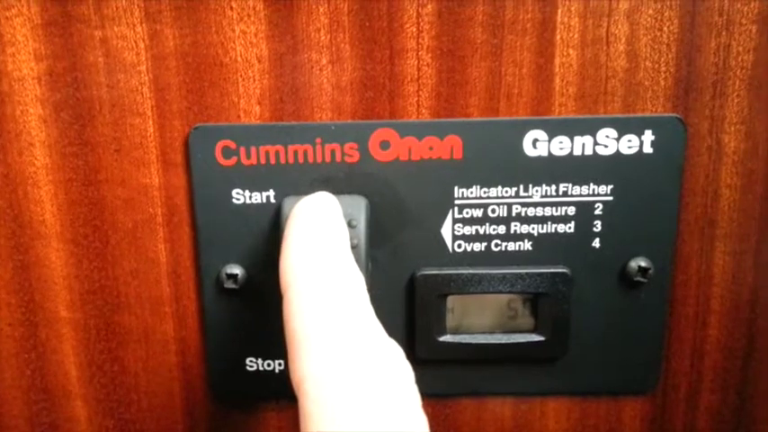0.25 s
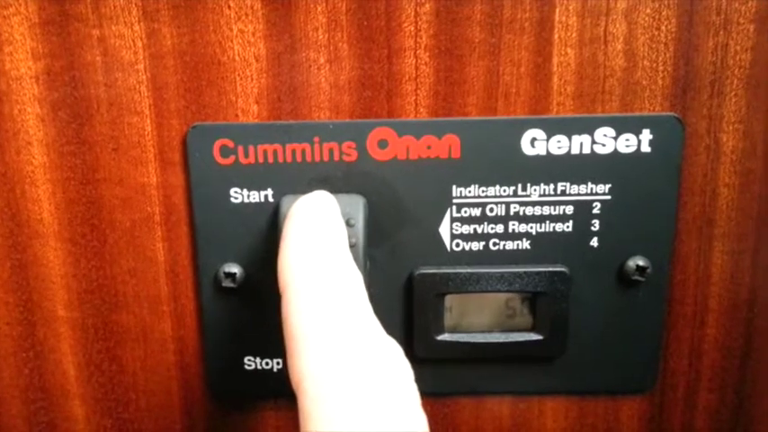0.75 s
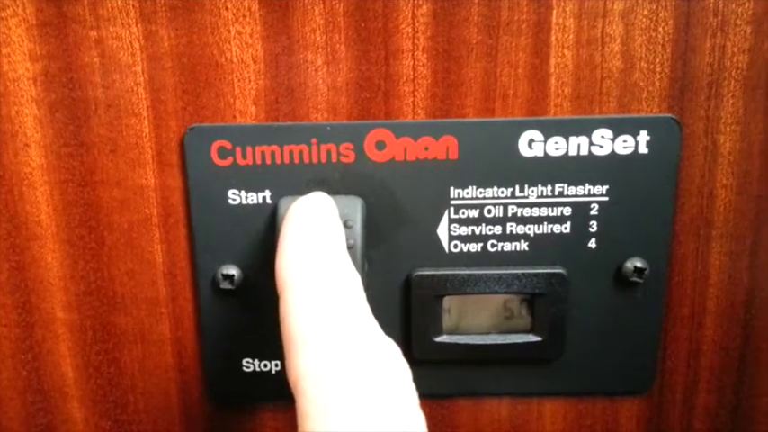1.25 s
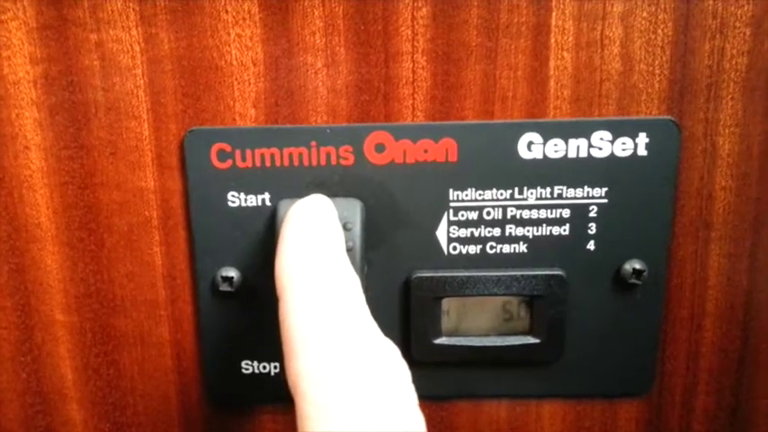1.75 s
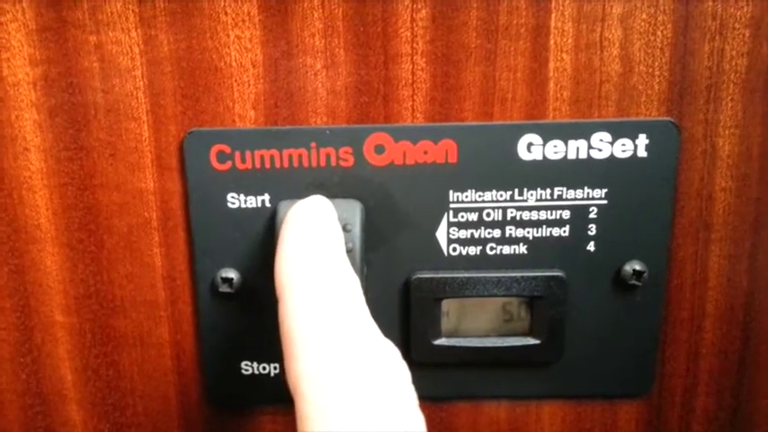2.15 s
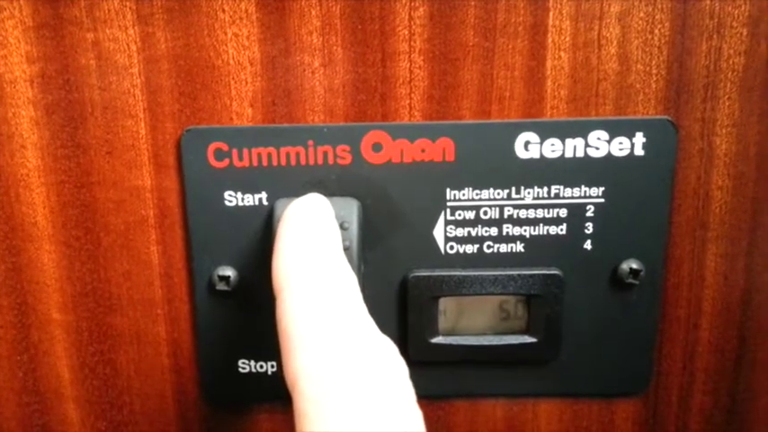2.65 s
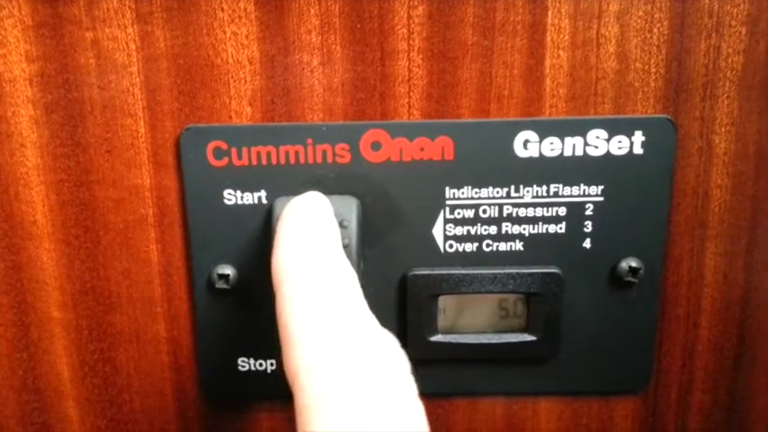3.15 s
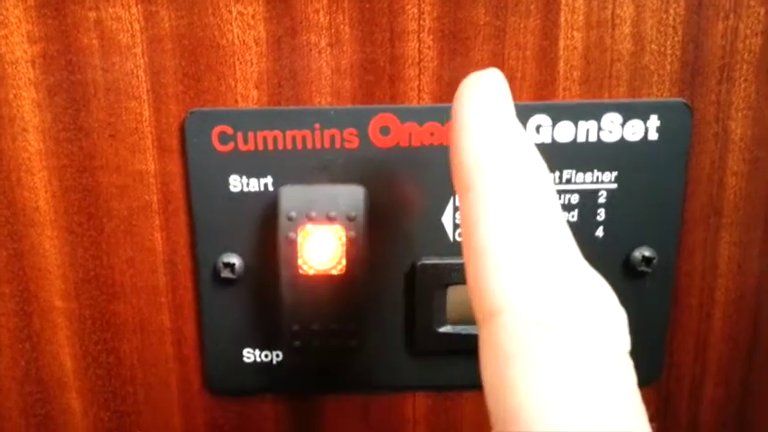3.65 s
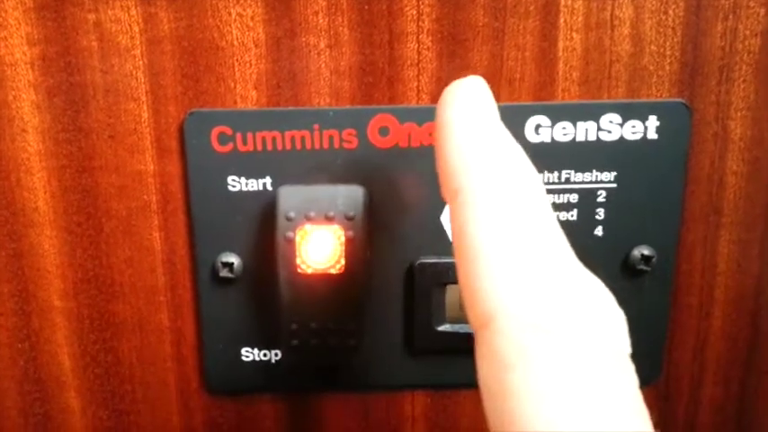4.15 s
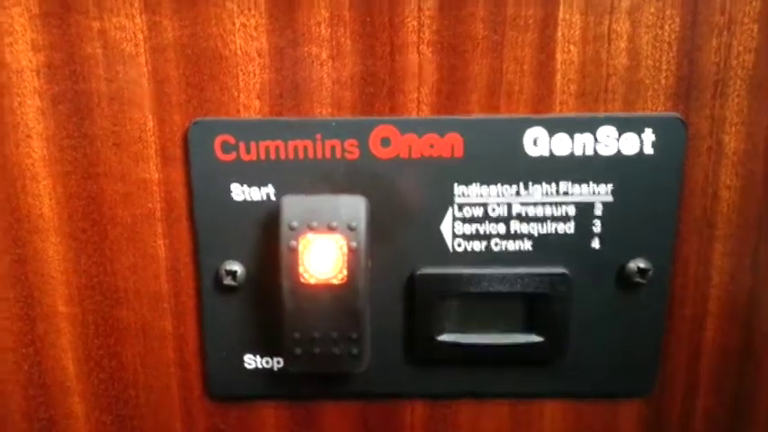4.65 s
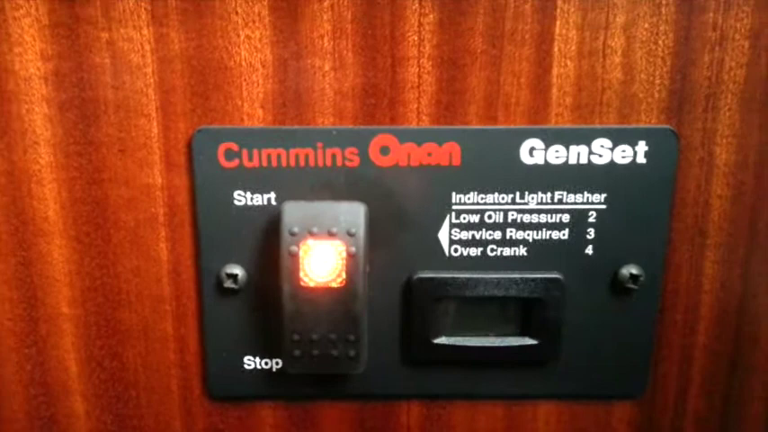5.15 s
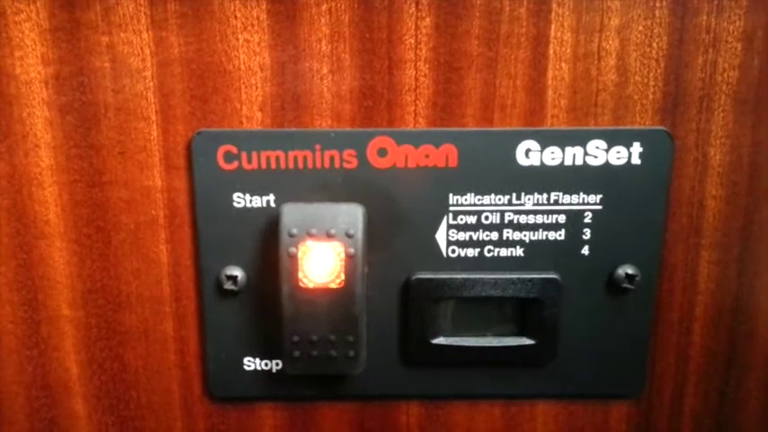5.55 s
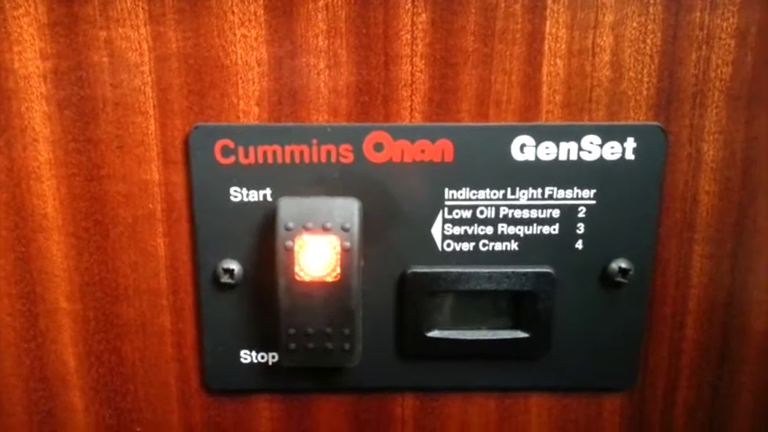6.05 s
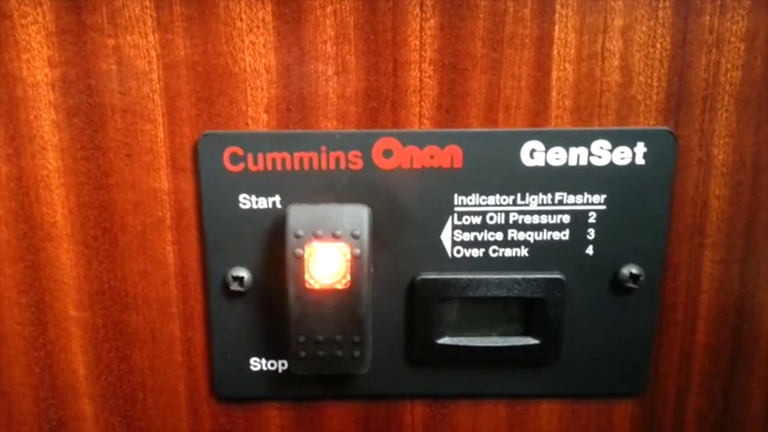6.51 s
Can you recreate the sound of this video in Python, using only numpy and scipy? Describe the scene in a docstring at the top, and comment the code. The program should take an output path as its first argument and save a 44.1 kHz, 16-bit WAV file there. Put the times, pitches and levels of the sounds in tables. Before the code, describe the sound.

A small generator cranks with a grinding geared whine, catches in booming stutters, then settles to a steady muffled hum with clicks and a relay clack.

```python
"""A small propane generator is started beneath a camper and heard through the floor, on one microphone.
Geared whine and noise make the starter; sums of engine orders make the chuff and the hum.
Ringing modes and noise bursts make the firings as it catches, surges and settles into a governed hum.
A rocker switch snaps back, small clicks and swishes pass, and a relay clacks in, over a faint noise floor.
Levels in dB are relative: each layer adds its own gain."""
import sys
import numpy as np
from scipy import signal
from scipy.fft import rfft, irfft, next_fast_len
from scipy.io import wavfile

SR = 44100
rng = np.random.default_rng(int(sys.argv[2]) if len(sys.argv) > 2 else 0)


def put_to_file(sound):
    """Save the sound as 16-bit audio at rate SR, in the file named by the first command-line argument."""
    columns = np.atleast_2d(sound).T  # one column per channel
    safe = np.clip(columns, -1, 1)
    whole_steps = np.round(safe * 32767)
    wavfile.write(sys.argv[1], SR, whole_steps.astype(np.int16))


N = 298909
TIME = np.arange(N) / SR   # s
CUTOFF_HZ = 14700   # top of the microphone channel
FIRST_FIRING_S = 2.53


def from_db(db):
    """Decibels to an amplitude factor."""
    return 10 ** (np.asarray(db) / 20)


def rms_one(x):
    """Scales a signal to an rms of 1."""
    return x / np.sqrt(np.mean(x ** 2) + 1e-20)


def in_time(rows):
    """Each column of a curve, joined by straight lines."""
    s, *columns = np.transpose(rows)
    return [np.interp(TIME, s, c) for c in columns]


def ramp(start, length):
    """Goes from 0 to 1 in a straight line."""
    return np.clip((TIME - start) / length, 0, 1)


def white():
    """White noise over the whole scene."""
    return rng.standard_normal(N)


def drift(rate):
    """Slow chance with a spread of 1, weaker above the given rate in Hz."""
    hz = np.fft.rfftfreq(N, 1 / SR)[:4000]
    slow = irfft(rfft(rng.standard_normal(7998)) / (1 + (hz / rate) ** 2))
    return np.interp(TIME, np.linspace(0, N / SR, len(slow)), rms_one(slow))


def coloured(x, spectrum):
    """A sound shaped by a spectrum of (Hz, dB per Hz); rms 1."""
    size = next_fast_len(N)
    hz, db = np.transpose(spectrum)
    bins = np.fft.rfftfreq(size, 1 / SR) + 1
    gain = from_db(np.interp(np.log(bins), np.log(hz), db))
    return rms_one(irfft(rfft(x, size) * gain, size)[:N])


def resonant_noise(resonances):
    """Each resonance rings on noise of its own, with steep skirts; rms 1."""
    out = 0
    for hz, width, db in resonances:
        edges = [hz - width / 2, hz + width / 2]
        band = signal.butter(2, edges, "band", fs=SR, output="sos")
        out = out + from_db(db) * np.sqrt(width) * rms_one(signal.sosfilt(band, white()))
    return rms_one(out)


def dying(start, t60, rise=0.00053):
    """An envelope that jumps up and dies away by 60 dB in t60 seconds."""
    age = np.maximum(TIME - start, 0)
    return (1 - np.exp(-(age / rise) ** 2)) * from_db(-60 * np.minimum(age / t60, 5))


def bursts(at, level_db, t60, rise):
    """The joint envelope of dying bursts that start at the given samples, each at its own level."""
    energy = np.zeros(N)
    energy[at] = from_db(level_db) ** 2
    shape = dying(0, t60, rise)[:SR] ** 2
    return np.sqrt(np.abs(signal.fftconvolve(energy, shape)[:N]))


def ring(clicks, hz, t60):
    """A unit click sets a sine of height 1 ringing."""
    r, w = from_db(-60 / (t60 * SR)), 2 * np.pi * hz / SR
    return signal.lfilter([0, np.sin(w)], [1, -2 * r * np.cos(w), r * r], clicks + 1e-18)


def beat(turns, sharpness):
    """One smooth swell a turn; rms 1."""
    return rms_one(np.exp(sharpness * np.cos(2 * np.pi * turns)))


def orders(table, turns, smear, waver, odd_lag=0):
    """A repeating pressure pulse; the path smears its upper partials and they waver a little."""
    waver_rate = 9.2   # Hz
    out = 0
    for k, db in table:
        lag = odd_lag * (k % 2) + smear * k * rng.standard_normal() + waver * k * drift(waver_rate)
        out = out + from_db(db) * np.cos(2 * np.pi * k * turns + lag)
    return rms_one(out)


def knocks(turns, t60, uneven_db):
    """One knock a turn, each setting the same dense body modes ringing, for a quarter second at most."""
    clicks = np.diff(np.floor(turns), prepend=np.floor(turns[0])) * from_db(uneven_db * white())
    body = (white() * dying(0, t60))[:SR // 4]
    return rms_one(signal.fftconvolve(clicks, body)[:N])


def background():
    """Steady faint broadband noise under everything at the microphone."""
    return from_db(-55.5) * coloured(white(), [(20, -14), (200, -10), (2000, -2.5), (14000, -15.5)])


# Brief swishes. Each row: start in seconds, level in dB, attack in seconds, t60 in seconds.
SWISHES = [(4.44, -47, 0.015, 0.41), (4.599, -32, 0.0081, 0.36)]
# Their spectrum. Each row: frequency in Hz, density in dB per Hz.
SWISH_COLOUR = [(800, -26), (2200, 8), (3100, -2), (4000, -9), (7000, -1), (10000, -9), (12500, -4),
                (15000, -25)]


def swishes():
    """Short bursts of coloured noise with a fast grain."""
    envelope = sum(from_db(db) * dying(s, t60, rise=attack) for s, db, attack, t60 in SWISHES)
    grain = rms_one(from_db(2.3 * drift(260)))
    return envelope * grain * coloured(white(), SWISH_COLOUR)


# Small clicks. Each row: start in seconds, level in dB, centre in Hz, width in octaves, t60 in seconds.
TICKS = [(3.288, -31, 5470, 0.7, 0.038), (3.34, -30.5, 4930, 0.36, 0.036), (3.341, -38, 7400, 1, 0.019),
         (3.439, -41.5, 6300, 0.6, .06), (3.551, -40, 5240, 0.4, .022), (4.589, -26, 3400, 1.1, 0.018),
         (4.596, -25, 6800, 0.31, .022), (4.5979, -23, 1700, 1, 0.024), (4.6102, -33, 2950, 0.32, .035),
         (4.668, -39.5, 6000, 1, 0.086), (5.999, -42, 12500, .3, 0.042), (6.017, -26, 6740, 0.45, 0.018),
         (6.018, -36, 3600, 1.4, 0.018), (6.0175, -41, 12000, .4, 0.016), (6.027, -37, 12300, .4, 0.027)]


def ticks():
    """Dry little clicks: bursts of noise, each in its own band."""
    out = 0
    for s, db, hz, octaves, t60 in TICKS:
        edge = 2 ** (octaves / 2)
        edges = [hz / edge, min(hz * edge, CUTOFF_HZ)]
        band = signal.butter(1, edges, "band", fs=SR, output="sos")
        out = out + from_db(db) * dying(s, t60) * rms_one(signal.sosfilt(band, white()))
    return out


# Relay contacts. Each row: start in seconds, level in dB, pitch of the clack in Hz.
RELAY = [(6.0698, -11.5, 1290), (6.077, -19, 1550), (6.087, -21, 1490)]
# Resonances of the relay box. Each row: frequency in Hz, width in Hz, level in dB.
RELAY_BOX = [(950, 70, -7), (1160, 140, -1.5), (1770, 450, 1.5), (2410, 320, -6.5), (3100, 830, -14.5),
             (4400, 830, -15), (6360, 600, -21), (7700, 910, -22)]


def relay(tail_db=-31, tail_t60=1.28, thud_db=-25, thud_t60=0.99, crack_db=-13, clack_t60=0.026):
    """The contacts slam and bounce; their box rings on and the wall thuds."""
    start = RELAY[0][0]
    clack = 0
    for s, db, hz in RELAY:
        clack = clack + from_db(db) * dying(s, clack_t60) * np.sin(2 * np.pi * hz * (TIME - s))
    blows = sum(from_db(crack_db + db) * dying(s, 0.023) for s, db, _ in RELAY)
    # the tail is gritty: its level flickers by 2 dB
    tail = from_db(tail_db + 2.0 * drift(150)) * dying(start, tail_t60, rise=0.004)
    box = resonant_noise(RELAY_BOX) * np.hypot(blows, tail)
    wall = coloured(white(), [(20, -25), (55, -10), (120, 0), (300, 1), (600, -4), (900, -10), (2000, -55)])
    thud = from_db(thud_db) * wall * dying(start, thud_t60, rise=0.0085)
    return clack + box + thud


# Switch contacts. Each row: start in seconds, ring level in dB, crack level in dB.
SNAP = [(3.2930, -22, 1.5), (3.2925, -8, -31), (3.2941, -7, -28), (3.2977, -3.5, -20), (3.302, -24, -12)]
# Panel modes rung by the switch. Each row: frequency in Hz, level in dB, t60 in seconds.
ROCKER = [(678, -21, 0.075), (790, -18, 0.04), (930, -13, .04), (1170, -15, 0.037), (1482, -4, 0.025),
          (1830, -15, .025), (2070, -15, 0.02), (2330, -7, 0.022), (3133, 2.5, 0.029), (3260, -12, 0.03),
          (4370, -17.5, 0.027), (5400, -21, .02), (6440, -24, .018), (9765, -18, 0.014)]


def rocker(ring_db=-1, crack_db=-8, crack_t60=0.019, knock_db=-13, knock_t60=0.04):
    """The spring throws the switch back; it chatters on its stop, rings the panel, knocks on the wooden wall."""
    start = SNAP[0][0]
    crack = coloured(white(), [(100, -13), (750, 6), (1400, 7), (2500, -1), (4200, -14), (6500, 2),
                               (8500, -11), (10200, 0.5), (12000, -16), (15000, -18)])
    chatter = sum(from_db(db) * dying(s, crack_t60, rise=0.00068) for s, _, db in SNAP)
    wood = coloured(white(), [(150, -25), (400, 0), (800, 1), (2000, -1), (2700, -6), (3800, -31), (8000, -50)])
    knock = from_db(knock_db) * wood * dying(start, knock_t60, rise=0.0025)
    out = from_db(crack_db) * crack * chatter + knock
    for hz, mode_db, t60 in ROCKER:
        energy = sum((from_db(db) * dying(s, t60)) ** 2 for s, db, _ in SNAP)
        tone = np.sin(2 * np.pi * hz * (TIME - start))
        out = out + from_db(ring_db + mode_db) * np.sqrt(energy) * tone
    return out


def regulator(hz=1664.0, level_db=-43, overtone_db=-70):
    """A thin steady electrical whine and its fourth harmonic, two octaves up, once the set makes power."""
    on = np.sqrt(ramp(3.14, 0.52))
    phase = 2 * np.pi * hz * TIME
    tone = from_db(level_db + .5 * drift(8)) * np.sin(phase)
    overtone = from_db(overtone_db) * np.sin(4 * phase)
    return np.sqrt(2) * on * (tone + overtone)


# The drive grips again. Each row: centre in seconds, mesh level in dB, chirp level in dB.
GRIPS = [(2.832, -9, -47.5), (2.935, 0.5, -51)]


def grips():
    """Short bell-shaped swells of mesh noise and chirp each time the drive grips again."""
    grip_s = 0.03
    return sum(from_db(levels_db)[:, None] * np.exp(-((TIME - s) / grip_s) ** 2) for s, *levels_db in GRIPS)


def overrun(hz=6560, width_hz=220):
    """The starter's clutch chirps each time it grips: narrow noise under the grip swells."""
    _, chirp = grips()
    return resonant_noise([(hz, width_hz, 0)]) * chirp


# Armature before drag and coasting, stepping up as the engine helps.
# Each row: time in seconds, speed in turns per second.
ARMATURE = [(0, 130.4), (0.8, 130.75), (1.5, 131.0), (2.1, 131.5), (2.48, 131.8), (2.53, 132.6),
            (2.56, 137), (2.86, 137), (2.9, 140)]
# Gear tones. Each row: multiple of the armature rate, rms level in dB.
STARTER_ORDERS = [(6, -45), (14, -49.5), (15, -38.5), (16, -45)]
# Grinding gears. Each row: frequency in Hz, density in dB per Hz.
GEAR_NOISE = [(25, -60), (60, -41), (150, -14), (260, -7), (380, -13), (600, -8), (800, -8.5), (1250, -10),
              (1650, -11), (2050, -10.5), (2450, -21.5), (3700, -46), (7800, -45), (14500, -56)]
# Hiss of the loaded gear teeth. Each row: frequency in Hz, density in dB per Hz.
TOOTH_HISS = [(2000, -22), (2800, 6.5), (3700, 2.5), (4400, -2.5), (7800, -0.5), (10000, -15), (14500, -22)]
# Starter housing resonances. Each row: frequency in Hz, width in Hz, level in dB.
HOUSING = [(421, 21.6, -8), (505.7, 24, -8.5), (595, 24, -5), (685, 26, -4.5), (728, 23, -7.5),
           (868, 37, -2), (969, 39, -3), (1071, 24, -7.5), (1146, 43, -3), (1273, 23, -10), (1345, 20, -8),
           (1440, 34, -4.5), (1564, 42, -4.5), (1724, 40, -7.5), (1830, 70, -8), (1924, 27, -2.5),
           (1988, 36, -0.5), (2094, 52, -0.5), (2205, 44, -9.5), (2328, 45, -17.5), (2760, 58, -21.5),
           (3230, 38, -20), (3720, 75, -21.5)]
# Whirr of the starter pinion. Each row: frequency in Hz, width in Hz, level in dB.
PINION = [(6180, 65, 2.5), (6510, 210, 0.5), (7350, 130, -3.5), (7835, 156, 1), (9780, 450, -9.5)]
PINION_FADE_S, PINION_FADE_DB = 0.6, 12   # the pinion unloads once the engine fires
LET_GO_S, LET_GO_FADE_S, SLACK_DB = 2.745, 0.053, -2.5   # the engine outruns the drive
SLACK_PINION_DB = -15   # the slack pinion all but stops whirring
CUT_OUT_S, CUT_OUT_FADE_S, CUT_OUT_DROP_DB = 2.955, 0.028, 5.5   # the current is cut
COAST_DB_PER_S, COAST_S = 21, 0.56   # level loss; time constant of the slowing
TURN_DRAG, STROKE_DRAG = 0.15, 0.24   # sharpness of the swells, two and four to a cycle


def starter(cycles, gear_hz=2015, gear_width_hz=230, pinion_db=-53, drag_phase=0.36, unload_db=-3):
    """Gears whine and grind in the housing; strokes drag the armature until it is outrun and coasts down."""
    coasting = np.maximum(TIME - CUT_OUT_S, 0)
    speed = in_time(ARMATURE)[0] * np.exp(-coasting / COAST_S)
    speed = speed * (1 + 0.0011 * np.sin(2 * np.pi * cycles) + 0.0011 * drift(32.0))
    turns = np.cumsum(speed) / SR
    whine = 0
    for k, db in STARTER_ORDERS:
        # the mesh tones fade once they climb past the ring gear's resonance
        past = np.maximum(k * speed - gear_hz, 0) / (gear_width_hz / 2)
        level = from_db(db + drift(23)) / np.sqrt(1 + past ** 4)
        whine = whine + level * np.sqrt(2) * np.sin(2 * np.pi * k * turns)
    eased = ramp(FIRST_FIRING_S, PINION_FADE_S)
    slack = ramp(LET_GO_S, LET_GO_FADE_S)
    thumps = knocks(cycles, t60=0.42, uneven_db=1.0)
    grind = from_db(-34) * coloured(white() + 0.5 * thumps, GEAR_NOISE)
    housing = from_db(-32.5 + unload_db * eased) * resonant_noise(HOUSING)
    whirr_db = pinion_db - PINION_FADE_DB * eased ** 2 + SLACK_PINION_DB * slack
    pinion = from_db(whirr_db) * resonant_noise(PINION)
    mesh_grip, _ = grips()
    mesh = from_db(SLACK_DB * slack) + mesh_grip
    cut_out = ramp(CUT_OUT_S, CUT_OUT_FADE_S)
    power = from_db(-CUT_OUT_DROP_DB * cut_out - COAST_DB_PER_S * coasting)
    drag = beat(2 * (cycles - drag_phase), TURN_DRAG) * beat(4 * (cycles - drag_phase), STROKE_DRAG)
    hiss = from_db(-53 + SLACK_DB * slack) * coloured(white(), TOOTH_HISS)
    teeth = mesh * (whine + housing) * drag + hiss
    return power * (teeth + (grind + pinion) * beat(turns, sharpness=0.081))


MOUNT_RATE, MOUNT_WIDTH = 17.4, 9.3   # resonance of the mounts, engine cycles per second


def mounts(cycles, speed, force_db, shake_db=-11):
    """Running up, the set passes through the resonance of its mounts and shakes the floor."""
    resonance = 1 / np.hypot(1, (speed - MOUNT_RATE) / (MOUNT_WIDTH / 2))
    rumble = coloured(white(), [(30, -39), (52, 7), (85, 15.0), (115, -28), (170, 10), (260, -4.5), (400, -43.5)])
    shake = ramp(FIRST_FIRING_S, 0.046) * from_db(shake_db + force_db)
    return shake * resonance * rumble * beat(cycles, sharpness=0.12)


def roar(cycles, force_db, level_db=-21):
    """At open throttle the exhaust roars between the single firings."""
    rush = coloured(white(), [(60, -40), (170, 0), (300, 0), (380, -7), (500, -4), (680, -6),
                              (850, -15), (1600, -22), (3000, -55)])
    return ramp(3.27, 0.06) * from_db(level_db + force_db) * rush * beat(cycles, sharpness=0.2)


# Single firings, weak at first, hard as it catches, one late. Each row: start in seconds,
# exhaust lag in seconds, boom level in dB, bark level in dB, rattle level in dB.
FIRINGS = [(2.586, 0.0053, -34, -28, -57), (2.977, 0.0087, -30, -36, -60), (3.040, .004, -39, -38, -60),
           (3.108, 0.0062, -19, -21, -47), (3.157, 0.0067, -28, -35, -48), (3.190, .006, -24, -42, -55),
           (3.272, 0.0072, -21, -34, -55), (3.298, .004, -12.5, -37, -55), (3.326, .004, -15, -24, -50),
           (3.338, .018, -11.5, -26, -25), (3.385, 0.014, -10.5, -18, -23.5), (3.437, 0.018, -11, -24, -26),
           (3.478, 0.0062, -11.5, -17, -25.5), (3.519, 0.0045, -13.5, -17, -23.5),
           (3.552, 0.0045, -12, -23, -40), (3.584, 0.0029, -9.5, -16.5, -28),
           (3.622, 0.0037, -12, -17.5, -27), (3.654, 0.0028, -15, -21, -34), (3.685, 0.0029, -13, -25, -34),
           (3.718, .004, -18, -27, -40), (3.9, 0.0061, -18, -34, -46)]
# Floor and cabin modes. Each row: frequency in Hz, level in dB, t60 in seconds.
CABIN = [(60.5, -6.5, 0.15), (83, 3.5, 0.18), (138, 1.5, 0.1), (176, -1.5, 0.18), (229.7, -1, 0.17),
         (252, -4, 0.065), (289, -7.5, 0.078), (408, -11.5, 0.16), (613, -14, 0.22)]
BARK_T60, RATTLE_T60, RUMBLE_T60, BARK_RISE_S = 0.07, 0.065, 0.13, 0.002   # s


def catching(boom_db=-8, uneven_db=1.5, rumble_db=-4):
    """Each firing rattles the casing; its exhaust barks, booms through the floor, rumbles on in the cabin."""
    s, exhaust_lag, force_db, bark_db, rattle_db = np.transpose(FIRINGS)
    fired = (s * SR).astype(int)
    vented = ((s + exhaust_lag) * SR).astype(int)
    boom = 0
    for k, (hz, mode_db, t60) in enumerate(CABIN):
        pushes = np.zeros(N)
        uneven = uneven_db * rng.standard_normal(len(s))
        pushes[vented] = from_db(boom_db + force_db + mode_db + uneven)
        boom = boom + (-1) ** k * ring(pushes, hz, t60)
    rumble = coloured(white(), [(35, -33), (70, -3.0), (150, 3.0), (290, 4.5), (380, -17), (600, -27),
                                (900, -18), (2000, -69)])
    bark = coloured(white(), [(100, -18), (200, -2), (300, 3), (380, -6), (650, -6), (850, -12),
                              (1500, -15.5), (3000, -58)])
    rattle = coloured(white(), [(400, -2), (1200, -6), (1900, 3), (2350, 2.0), (2900, -11.5), (4000, -21),
                                (8000, -33), (14000, -58)])
    out = (boom + rumble * bursts(vented, force_db + rumble_db, RUMBLE_T60, rise=0.0048)
           + bark * bursts(vented, bark_db, BARK_T60, rise=BARK_RISE_S)
           + rattle * bursts(fired, rattle_db, RATTLE_T60, rise=BARK_RISE_S))
    return signal.sosfilt(signal.butter(8, 48, "high", fs=SR, output="sos"), out)


# Chuff, then hum. Each row: multiple of the cycle rate, level in dB.
CHUFF_ORDERS = [(4, -33), (5, -26), (6, -0.5), (7, -25), (8, 1.5), (9, 5), (10, 4), (11, -28), (12, -24),
                (13, -20), (14, 8), (18, 4), (20, 2.5), (21, -30), (23, -8), (24, 2.5), (26, -3), (28, -5),
                (32, -6)]
HUM_ORDERS = [(1, -44), (2, 0), (3, -11.5), (4, -22), (5, -14.5), (6, -20), (7, -15.5), (8, -11.5),
              (9, -17), (10, -18), (11, -20), (12, -21.5), (13, -26), (14, -23.5), (15, -26), (16, -21.5),
              (17, -26), (18, -36), (19, -20.5), (20, -24), (21, -24), (22, -24), (23, -24.5), (24, -24),
              (25, -27.5), (26, -37), (27, -28), (28, -32.5), (29, -30.5), (30, -28.5), (31, -27.5),
              (32, -28), (33, -33), (34, -37), (35, -30), (36, -28), (37, -29.5), (38, -30), (39, -34),
              (40, -29)]
# Puff of air, clatter, then valve gear. Each row: frequency in Hz, density in dB per Hz.
PUFF = [(120, -31), (190, 2), (260, 1), (310, -5.5), (420, -25), (800, -50)]
CLATTER = [(30, -50), (70, -15), (115, -17.5), (165, -13.5), (240, -12.5), (310, -11.5), (350, -21),
           (450, -17.5), (600, -14), (800, -20.5), (1150, -18.5), (1600, -21.5), (2300, -30.5),
           (2600, -35.5), (3600, -49.5), (14500, -70)]
TAPPETS = [(900, -28), (1300, 1.5), (1900, -3), (2400, -9.5), (3200, -27.5), (8000, -45)]
# Engine casing and its bay, then a loose rocker arm. Each row: frequency in Hz, width in Hz, level in dB.
CASING = [(291.3, 29, 13), (599, 71, 7), (942, 120, 5.5), (2005, 104, 2.5), (2880, 540, -16.5),
          (5370, 1030, -23), (6600, 270, -32), (7460, 750, -28)]
ROCKER_ARM = [(2320, 54, 2), (2406, 180, -13.5), (2130, 100, -5)]
RUNNING_RATE = 31.05   # engine cycles per second
CHUFF_DB, CHUFF_UP_TO_RATE, CHUFF_LOSS_DB_PER_RATE = -39.5, 17, 6   # fades above this cycle rate
PUFF_DB, PUFF_PHASE = 1, 0.54   # against the compression thump; share of a cycle
HUM_DB, HUM_DB_PER_RATE = -22, 2.5   # at running rate; per cycle per second
CLATTER_BUILD_S, CLATTER_SURGE_DB, CLATTER_DB_PER_RATE = 0.44, 4.5, 0.3
CYCLE_SWELL, VALVE_SWELL = 0.24, 0.15   # sharpness of the swell with each cycle and each valve beat
CHIRP_DB, CHIRP_UNEVEN_DB = -50.5, 2.2
CHIRP_PHASE, CHIRP_SHARPNESS = 0.91, 0.85   # share of a cycle; sharpness of the swell


def engine(cycles, speed, force_db):
    """Chuffs while cranked, hums more with speed; valves clatter in the casing, harder at open throttle."""
    chuff_db = CHUFF_DB - CHUFF_LOSS_DB_PER_RATE * np.maximum(speed - CHUFF_UP_TO_RATE, 0)
    thump = orders(CHUFF_ORDERS, cycles - .03, smear=0.068, waver=0.017)
    air = coloured(knocks(cycles, t60=0.88, uneven_db=1.5), PUFF)
    puff = air * beat(cycles - PUFF_PHASE, sharpness=0.93)
    chuff = from_db(chuff_db) * (thump + from_db(PUFF_DB) * puff)
    over_rate = speed - RUNNING_RATE
    # odd orders are shifted a quarter of their own period, for a smoother hum
    pulses = orders(HUM_ORDERS, cycles, smear=0.1984, waver=0.011, odd_lag=np.pi / 2)
    hum = from_db(HUM_DB + HUM_DB_PER_RATE * over_rate) * pulses
    strokes = beat(cycles, CYCLE_SWELL) * beat(3 * cycles, VALVE_SWELL)
    rattle = from_db(-34) * coloured(white() * strokes, CLATTER)
    tappets = from_db(-45) * coloured(knocks(cycles, t60=0.29, uneven_db=0.5), TAPPETS)
    casing = from_db(-39.0) * resonant_noise(CASING) * strokes
    # the loose rocker arm chirps once a cycle
    arm = from_db(CHIRP_DB + CHIRP_UNEVEN_DB * drift(12)) * resonant_noise(ROCKER_ARM)
    chirps = arm * beat(cycles - CHIRP_PHASE, CHIRP_SHARPNESS)
    surge_db = CLATTER_SURGE_DB * from_db(force_db - force_db.max())
    clatter = ramp(FIRST_FIRING_S, CLATTER_BUILD_S) * from_db(surge_db + CLATTER_DB_PER_RATE * over_rate)
    return chuff + hum + clatter * (rattle + tappets + casing + chirps)


# Cranking, first weak firings, catch, governed run.
# Each row: time in seconds, speed in engine cycles per second.
SPEED = [(0.0, 9.312), (2.48, 9.312), (2.58, 13.504), (3.17, 13.563), (3.31, 22.123), (3.43, 21.335),
         (3.6, 31.473), (3.95, 31.188), (4.4, 31.104), (5.3, 31.058), (6.78, 31.04)]
# Throttle opening until the governor closes it, with one small after-surge.
# Each row: time in seconds, force in dB.
THROTTLE = [(2.58, -32), (2.92, -27), (3.05, -22), (3.12, -13), (3.25, -18.5), (3.33, -9), (3.52, -21),
            (3.69, -15), (3.79, -49), (3.9, -23), (4.02, -37)]


def scene():
    """Speed and throttle curves drive engine, roar and mounts; starter and firings also follow their own tables."""
    speed, = in_time(SPEED)
    force_db, = in_time(THROTTLE)
    cycles = np.cumsum(speed) / SR
    generator = (starter(cycles) + overrun() + engine(cycles, speed, force_db) + catching()
                 + roar(cycles, force_db) + mounts(cycles, speed, force_db) + regulator())
    return (background() + swishes() + ticks() + relay() + rocker() + generator)[None]


def record(dry):
    """The microphone channel rounds the peaks and cuts the top."""
    top_cut = signal.ellip(10, .2, 80, CUTOFF_HZ, fs=SR, output="sos")
    return signal.sosfilt(top_cut, np.tanh(dry))


dry = scene()
out = record(dry)
put_to_file(out)
```